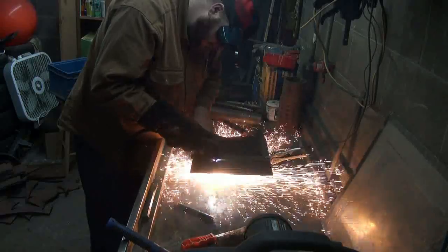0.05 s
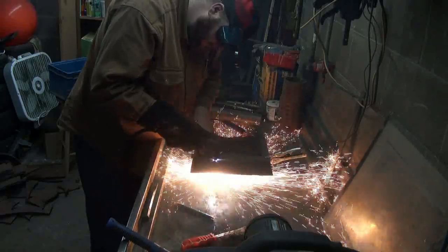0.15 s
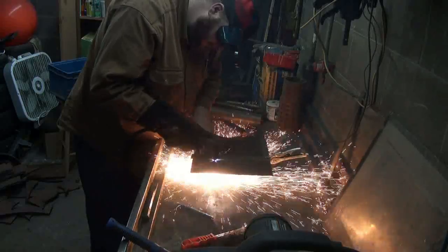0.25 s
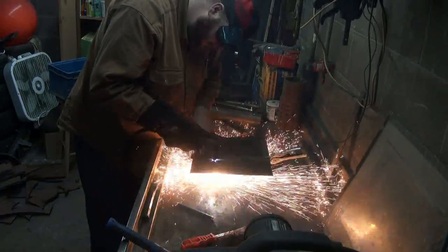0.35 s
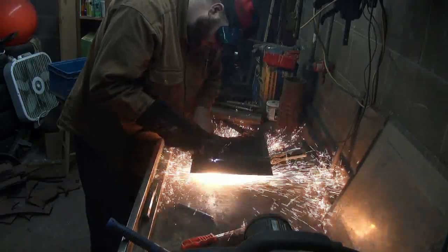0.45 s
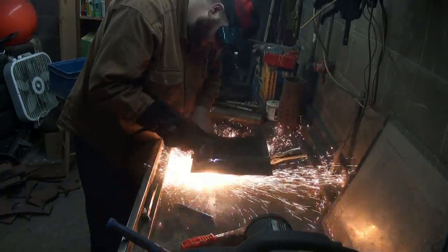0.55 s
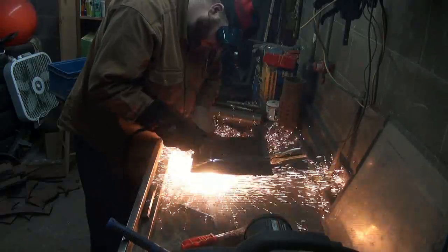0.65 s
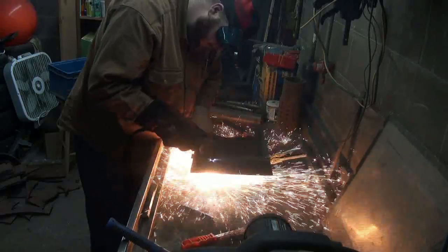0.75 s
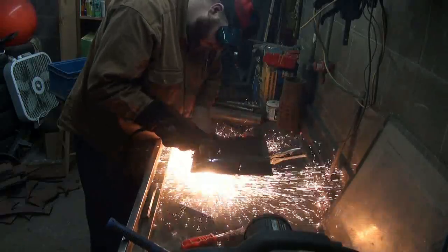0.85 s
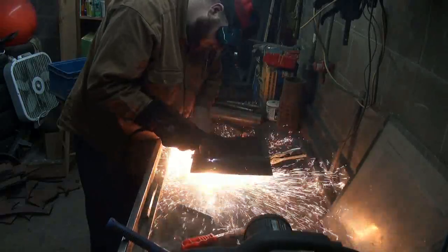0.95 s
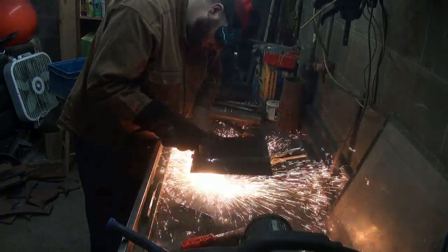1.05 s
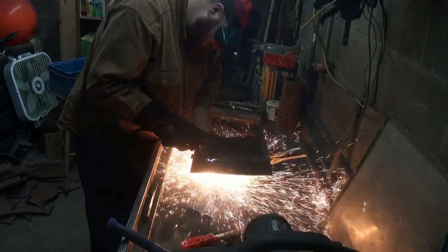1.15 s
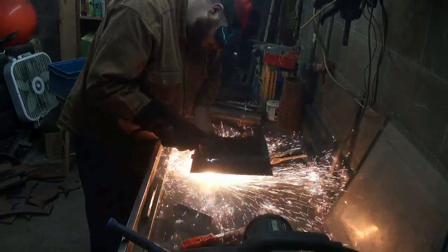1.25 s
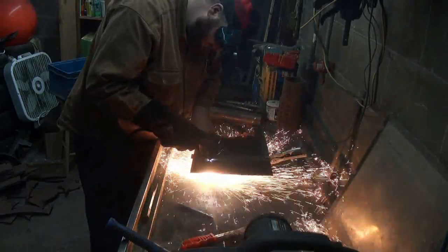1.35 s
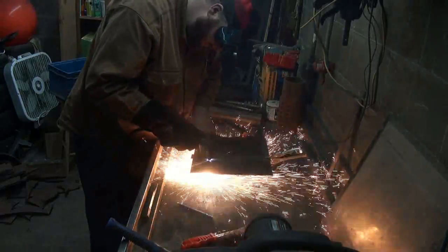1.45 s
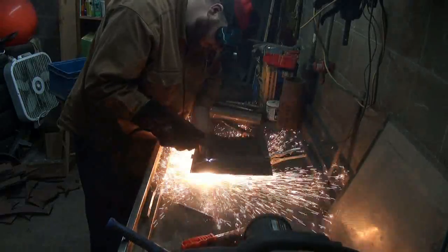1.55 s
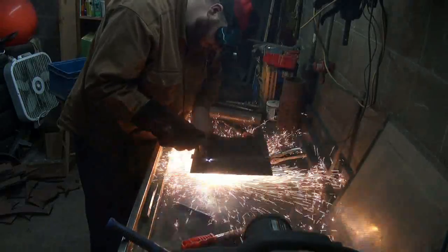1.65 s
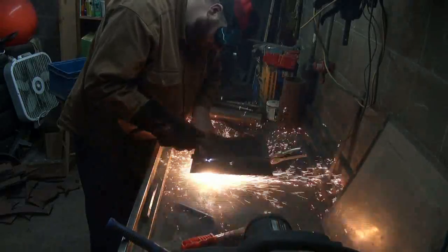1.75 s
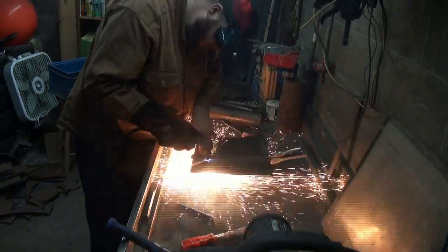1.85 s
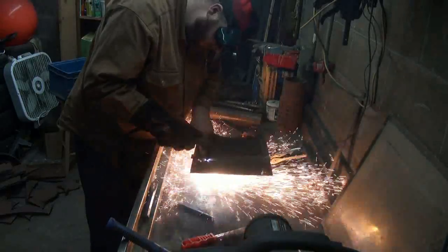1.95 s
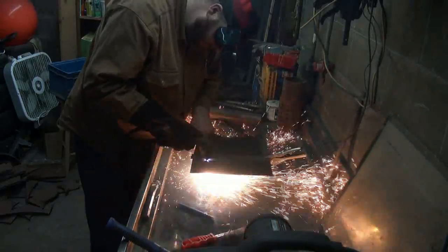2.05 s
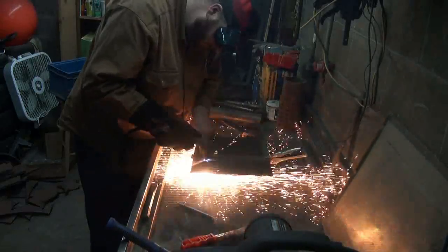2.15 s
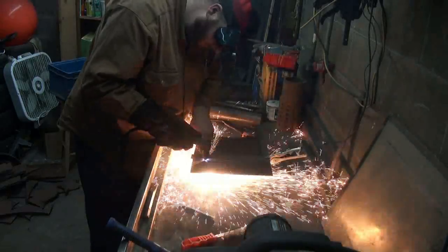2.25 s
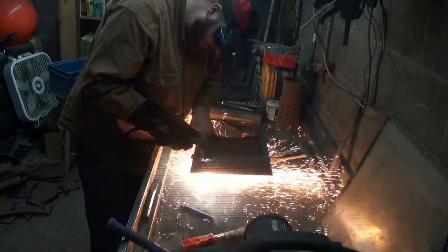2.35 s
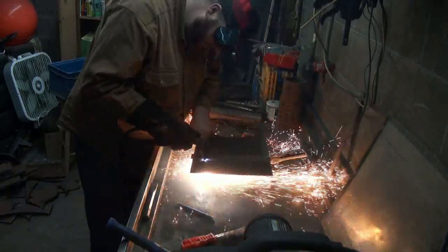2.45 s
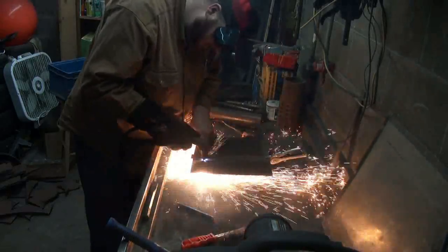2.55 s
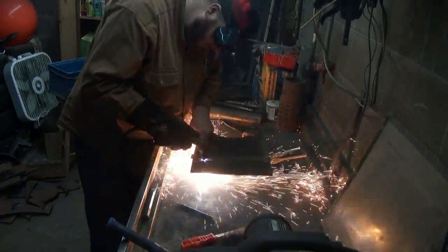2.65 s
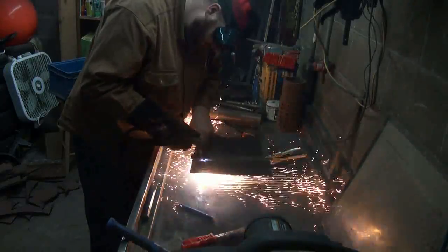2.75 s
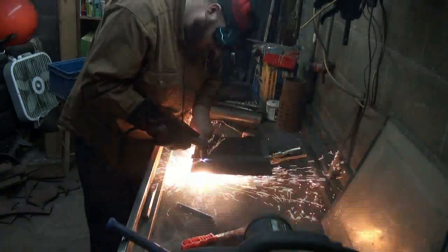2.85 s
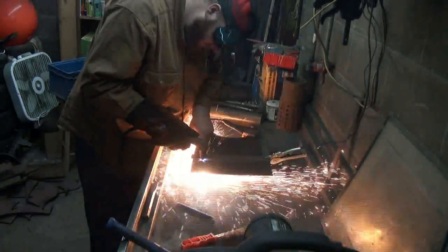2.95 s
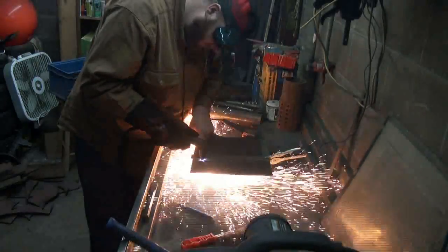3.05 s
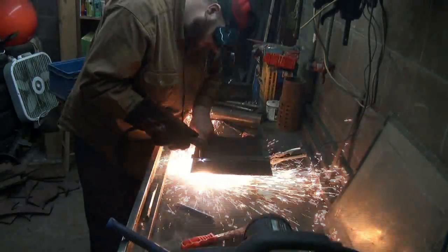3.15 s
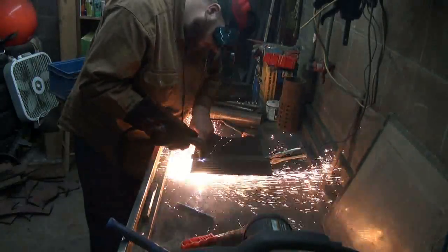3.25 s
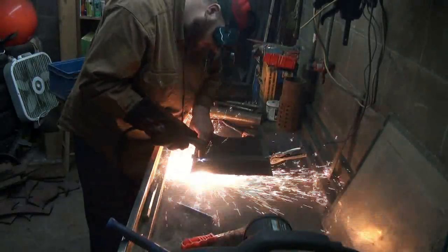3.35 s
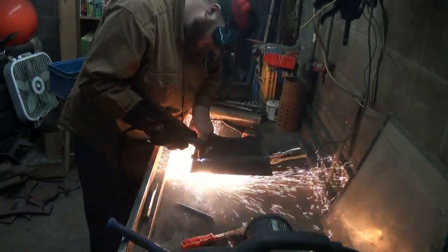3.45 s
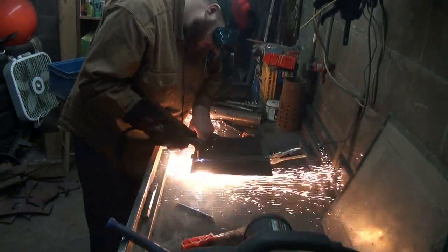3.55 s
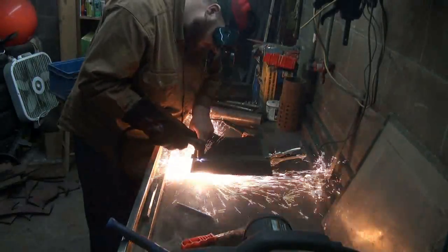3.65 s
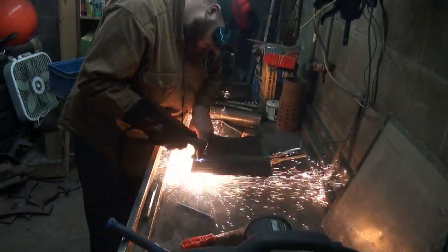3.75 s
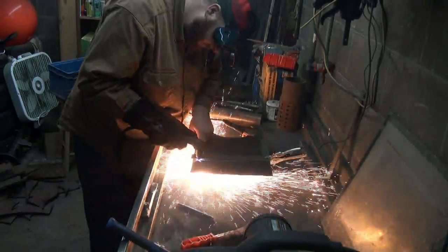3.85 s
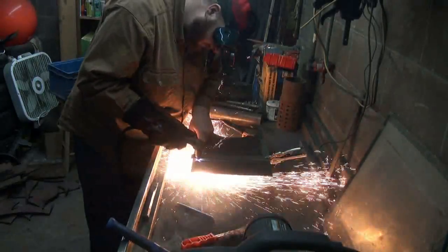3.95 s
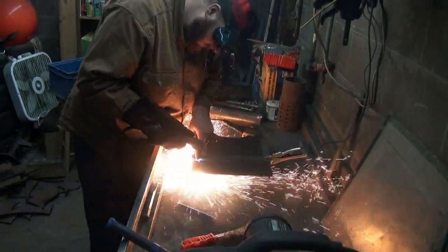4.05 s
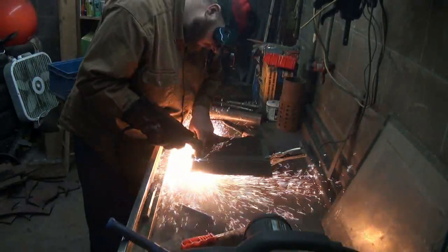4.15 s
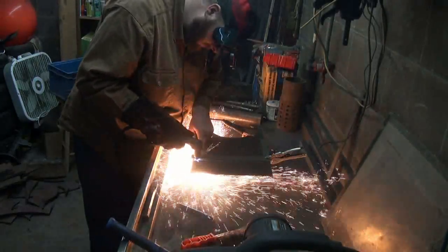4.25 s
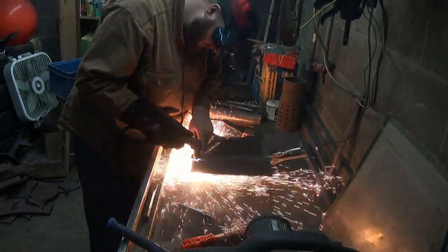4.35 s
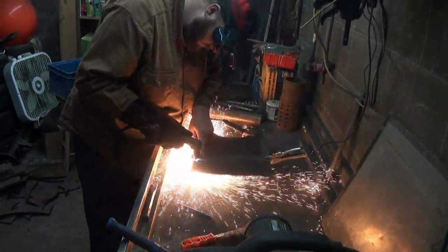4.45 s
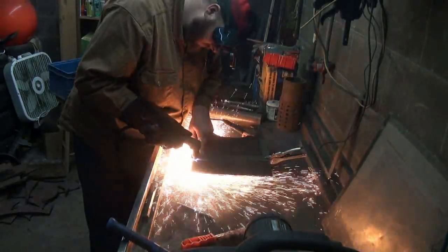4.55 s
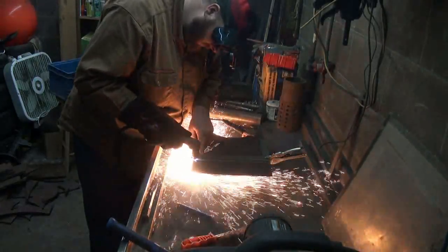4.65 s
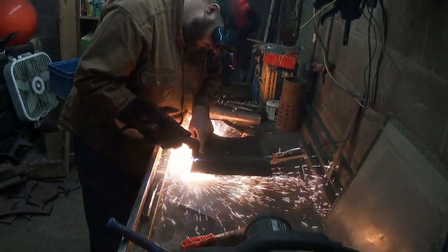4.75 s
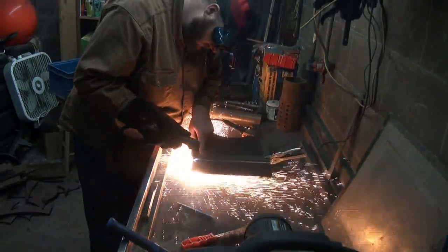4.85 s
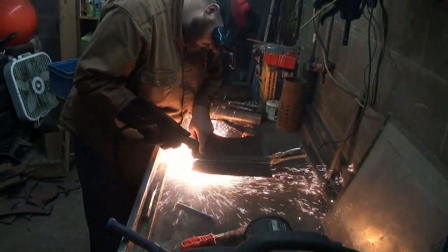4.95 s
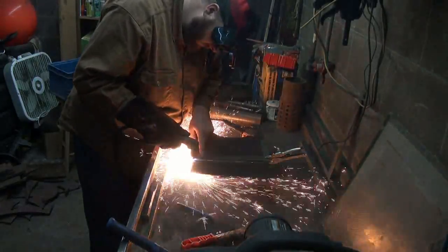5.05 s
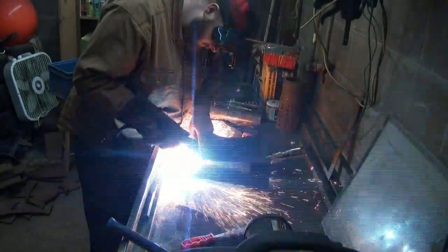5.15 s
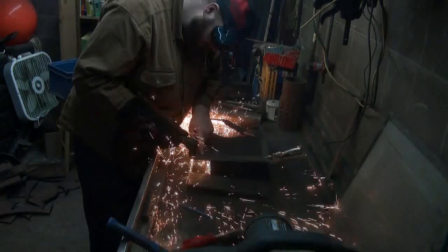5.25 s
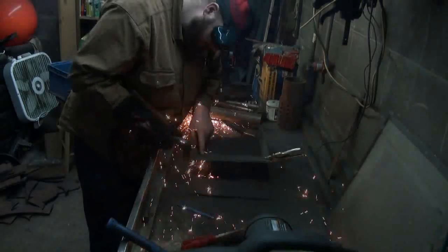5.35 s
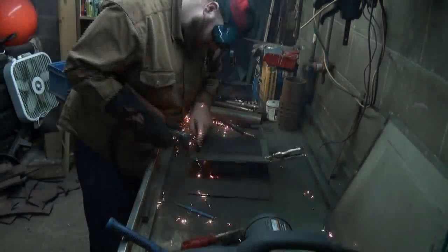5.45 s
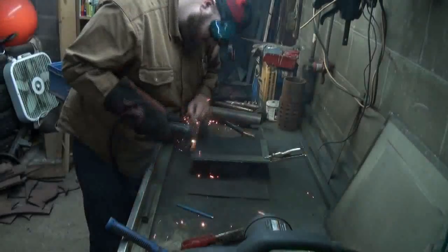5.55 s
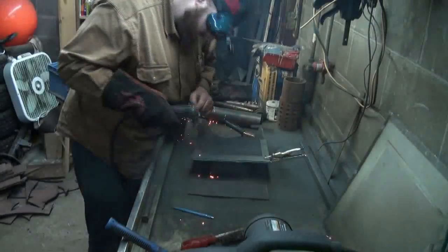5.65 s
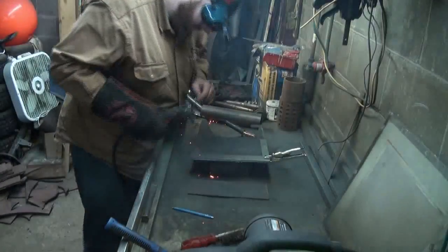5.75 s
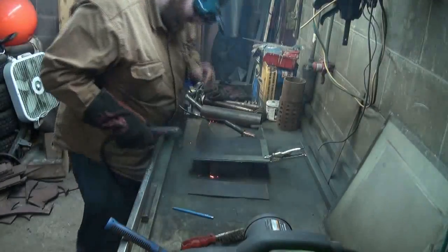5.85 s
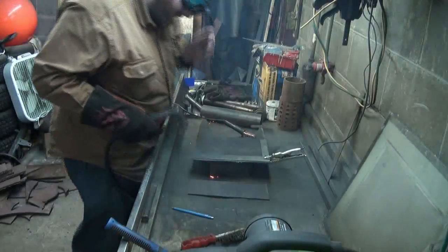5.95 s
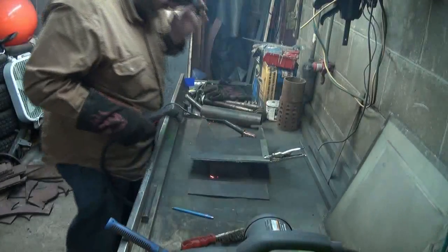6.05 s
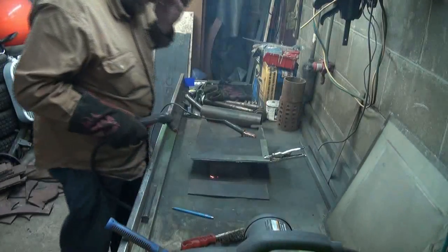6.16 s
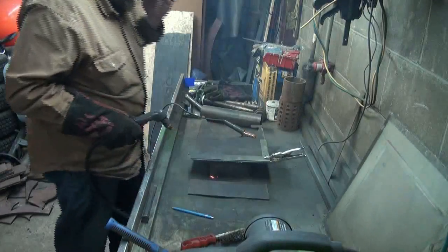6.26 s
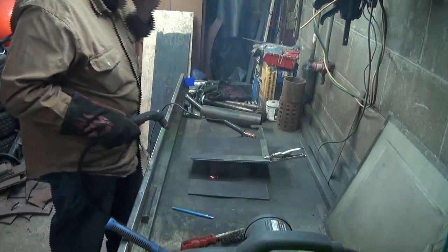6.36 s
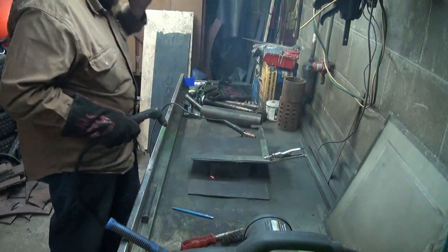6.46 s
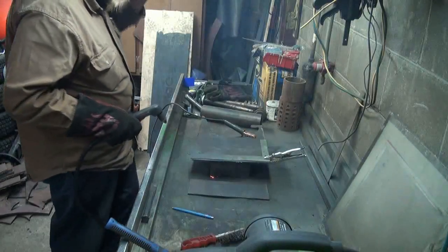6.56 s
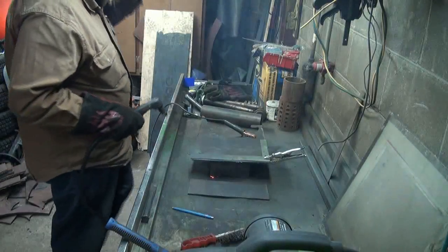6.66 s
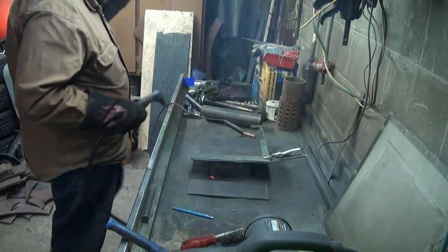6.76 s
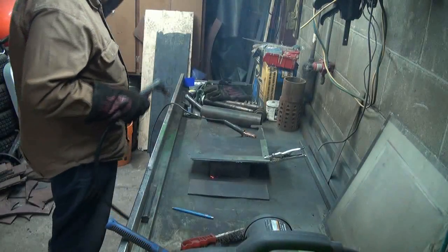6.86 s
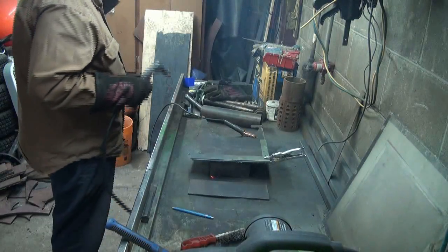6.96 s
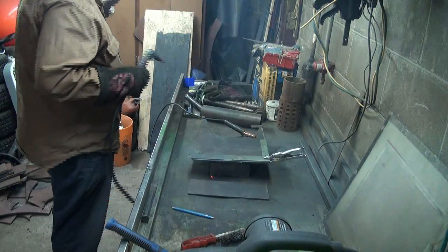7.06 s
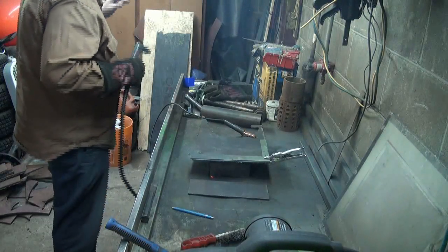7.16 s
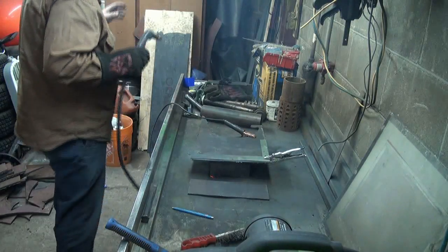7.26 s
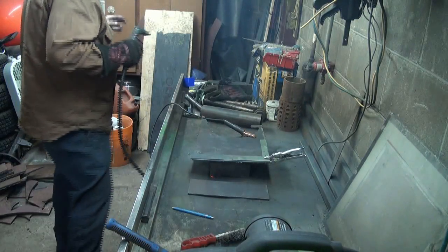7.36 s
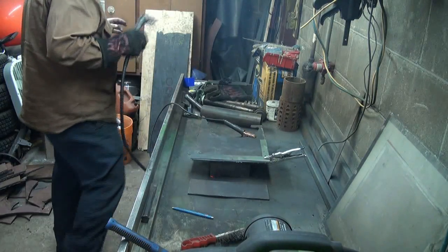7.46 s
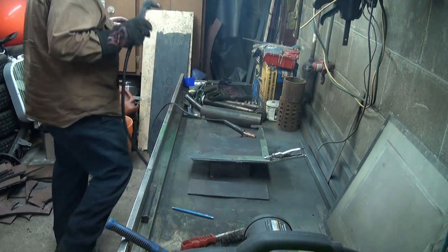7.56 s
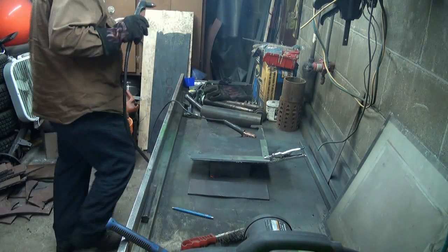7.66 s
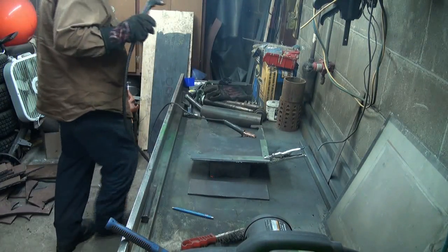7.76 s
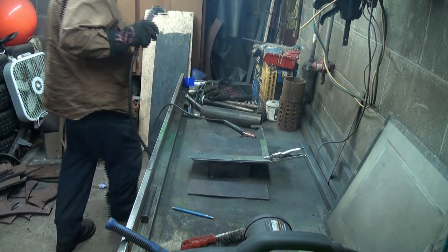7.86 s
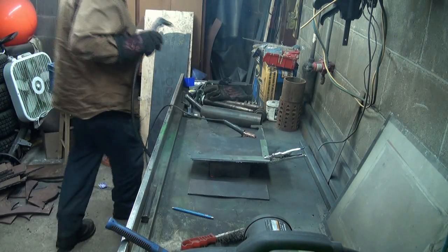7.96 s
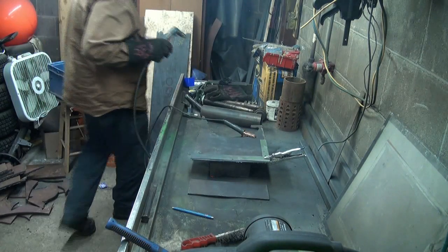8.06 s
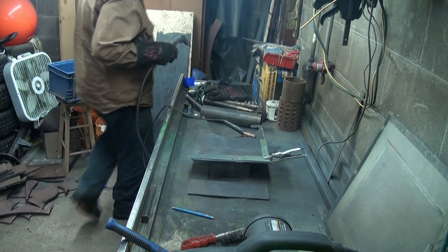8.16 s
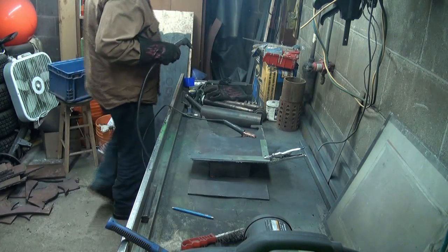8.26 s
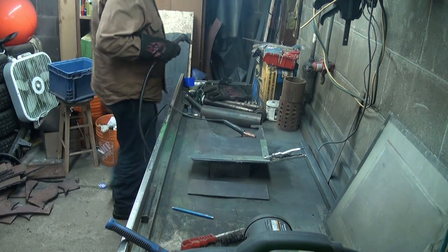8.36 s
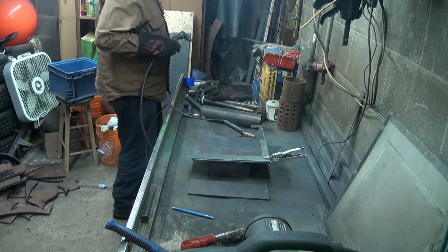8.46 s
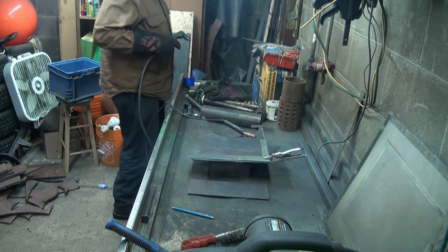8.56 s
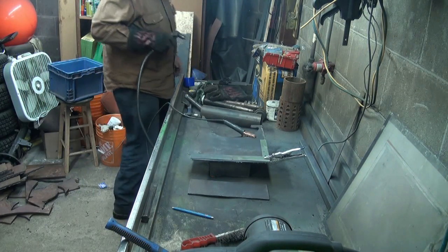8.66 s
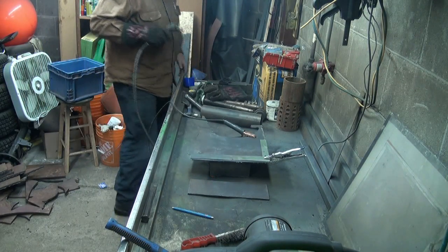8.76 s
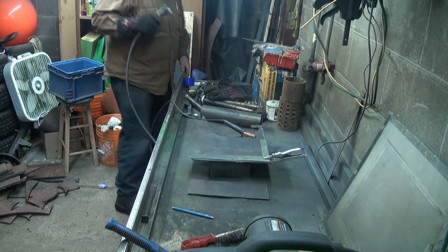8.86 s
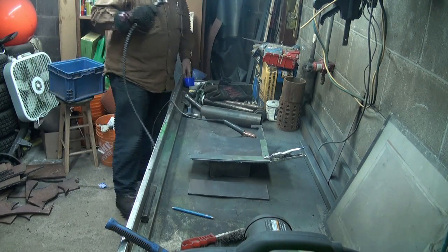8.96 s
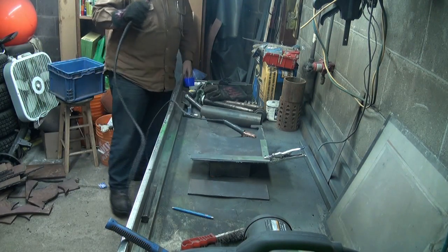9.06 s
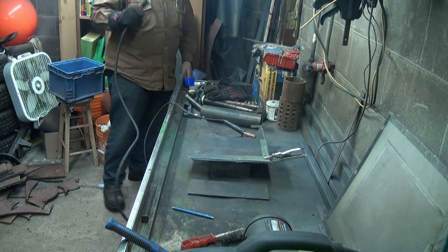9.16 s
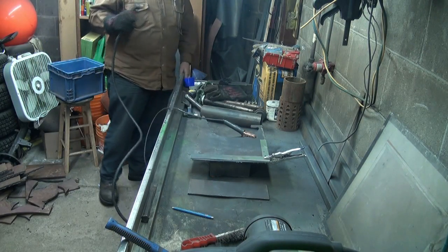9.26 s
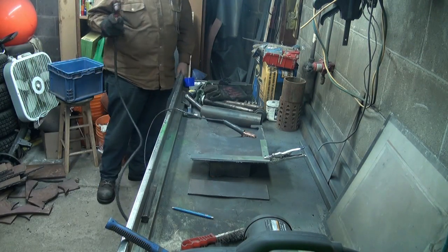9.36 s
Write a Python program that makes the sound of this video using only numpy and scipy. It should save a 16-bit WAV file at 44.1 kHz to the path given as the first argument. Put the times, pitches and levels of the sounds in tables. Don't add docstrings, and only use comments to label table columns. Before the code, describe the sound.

A plasma torch hisses and sputters loudly through steel plate, the offcut drops and clatters, then cooling air blows over a humming, ticking compressor.

```python
import sys
import numpy as np
from scipy import signal
from scipy.fft import rfft, irfft, next_fast_len
from scipy.io import wavfile
from scipy.ndimage import uniform_filter1d

SR = 44100
rng = np.random.default_rng(int(sys.argv[2]) if len(sys.argv) > 2 else 0)


def to_linear_factor(level_db):
    exponent = np.asarray(level_db, float) / 20
    return 10 ** exponent


def transcribe(signal):
    frames = np.atleast_2d(signal).T
    limited = np.clip(frames, -1, 1)
    pcm = np.round(limited * 32767).astype(np.int16)
    wavfile.write(sys.argv[1], SR, pcm)


N = 414540
TIME = np.arange(N) / SR
LEFT_RIGHT = np.array([[1], [-1]])
ARC_OUT_S, ARC_FADE_S = 5.372, 0.0075

# freq_hz, level_db (per Hz)
ARC_TONE = [(35, -46), (60, -29), (171, -19.5), (226, -26), (254, -16.5), (561, -19), (1010, -9),
            (1330, -10.5), (2870, -10.5), (11300, -0.5), (15700, -5.5)]
# freq_hz, side_minus_mid_db
ARC_SIDE = [(60, -12), (200, -6), (700, -4), (1700, -8), (3100, -7), (5500, -5.5), (8000, -4), (10300, -1),
            (11300, -5.5), (12200, -12), (15500, -8)]
# time_s, lift
LIFT = [(0, .6), (.45, 1), (.95, .55), (1.3, .95), (1.8, .85), (2, .3), (2.38, 0.15), (2.52, 0.55),
        (3.02, .2), (3.27, 0.64), (3.62, 0), (3.9, 0.2), (4.4, .2), (4.6, 0.4), (5.3, .5)]
# centre_s, level_over_roar_db, length_s
SPITS = [(0.233, 6, 0.3), (0.568, 3.5, .06), (.7, 2, .04), (0.853, 5.5, 0.045), (1.05, 3.5, 0.084),
         (1.433, 6.5, 0.14), (1.66, 4.5, 0.073), (1.735, 3, .04), (1.87, 3, .05), (1.986, 8.5, 0.11),
         (2.11, -5, .08), (2.224, 4.5, 0.043), (2.407, 7.5, 0.22), (2.61, 7.5, 0.025), (2.73, 6, 0.056),
         (2.817, -8, .08), (3.02, 3, 0.098), (3.3, 7.5, .06), (3.48, 1, .1), (3.693, 7.5, 0.074),
         (3.962, 3, 0.26), (4.212, 4, 0.17), (4.499, -1.5, .15), (4.65, 4, 0.082), (4.734, 2, .05),
         (5.083, 6, 0.055), (5.17, 1.5, .05)]


def arc():
    lift = curves(LIFT)[0]
    spit = sum(db * np.exp(-(2 * (TIME - s) / length) ** 2) for s, db, length in SPITS)
    flare = 3 * np.clip((TIME - 5.33) / 0.033 + 1, 0, 1)
    top = -18.5 - 0.16 * spit
    hiss = top + 3 * lift
    body = -19.5 - 3.5 * lift + 0.16 * spit + flare
    roar = -34 - 4 * lift + spit + 1.07 * walk(29.95)
    levels_db = (roar, body, hiss - 6.5, hiss - 3.8, top - 3.5)
    dry = jet(ARC_TONE, (2480, 7520, 9600, 12200), levels_db, (.1, .4, .8), (14, 40, 150))
    dry += nozzle(550, lift) * to_linear_factor(hiss)
    alive = np.exp(-np.clip(TIME - ARC_OUT_S, 0, 1) / ARC_FADE_S)
    pan_db = -3 - 1.5 * lift
    heard = shop(dry * alive, ARC_SIDE, echo=1.0, tail_db=-6.5, t60_s=0.21, hold_s=.26)
    return to_linear_factor(0.53 + pan_db * LEFT_RIGHT / 2) * heard


def jet(tone, edges_hz, levels_db, flutter_db, rates):
    together = sum(db * walk(rate) for db, rate in zip(flutter_db, rates))
    bounds = [0, *edges_hz, np.inf]
    out = 0
    for low_hz, high_hz, db in zip(bounds, bounds[1:], levels_db):
        def band_gain(hz):
            share = np.abs(above(hz, low_hz) - above(hz, high_hz))
            return shape(tone, hz) * np.sqrt(share)
        band = unit(colour(rng.standard_normal(N), band_gain))
        own = 0.32 * walk(22.05) + 0.68 * walk(4.05)
        out = out + band * to_linear_factor(db + together + own)
    return out


def nozzle(width_hz, lift):
    centre_hz = 11500 - 700 * lift + 249.8 * walk(4)
    a, b = colour(rng.standard_normal((2, N)), lambda hz: np.exp(-(hz / width_hz) ** 2))
    phase = 2 * np.pi * np.cumsum(centre_hz) / SR
    return unit(a * np.cos(phase) + b * np.sin(phase)) * to_linear_factor(-11 + 3 * lift + 1.1 * walk(8))


# start_s, level_db, contact_s, ring_t60_s, brightness_db (above 4.3 kHz)
DROP = [
    (5.318, -21.5, 0.021, 0.41, -5),
    (5.342, -17, 0.021, 0.21, 1),
    (5.37, -23, 0.015, 0.23, -4),
    (5.391, -22, 0.0078, 0.59, 3),
    (5.481, -21.5, 0.0064, 0.062, 6),
    (5.484, -17, 0.039, 0.29, -1),
    (5.548, -23.5, .006, 0.41, -6),
    (5.608, -35, .02, 0.24, -10),
]
# freq_hz, level_db (per Hz)
DROP_TONE = [(41, -54), (70, -22), (265, -4.5), (820, -4), (896, -4.5), (1220, -2), (2480, -9), (4620, -9),
             (6030, -15), (6440, -9.5), (14000, -29)]
# freq_hz, width_hz, level_db
PLATE = [(103, 16, 10), (172, 15, -4), (270, 14, -2), (378, 15, -3), (467, 29, -5.5), (720, 35, -7),
         (847, 25, -8), (1040, 33, -19), (1720, 31, -22), (2410, 40, -17), (5160, 90, -12), (6360, 80, -15)]
# start_s, pitch_hz, level_db, t60_s
RINGS = [
    (5.4835, 8400, -29, .12),
    (5.4835, 6450, -22.5, 0.11),
    (5.4835, 5100, -30, .06),
    (5.425, 2420, -31, 0.6),
]


def offcut():
    def rattle_gain(hz):
        modes = sum(1.34 * to_linear_factor(db) / (1 + ((hz - centre) / width) ** 2) for centre, width, db in PLATE)
        return shape(DROP_TONE, hz) * (0.66 + modes)

    rattle = colour(rng.standard_normal(N), rattle_gain)
    top = colour(rattle, lambda hz: above(hz, 4300))
    low = rattle - top
    scale = np.std(rattle)
    dry = 0
    for s, db, contact, t60, bright_db in DROP:
        since = TIME - s
        rise = np.clip(since / 0.001, 0, 1)
        after = np.clip(since - contact, 0, 9)
        bounce = low * to_linear_factor(-60 * after / t60) + top * to_linear_factor(bright_db - 90 * after / t60)
        dry = dry + rise * to_linear_factor(db) * bounce
    for s, hz, db, t60 in RINGS:
        since = np.clip(TIME - s, 0, 9)
        ring = np.sin(2 * np.pi * hz * since + .5 * walk(200)) * (since > 0)
        dry = dry + scale * to_linear_factor(db + 4.5 - 60 * since / t60) * ring
    dry = dry / scale * to_linear_factor(0.48 * walk(120))
    heard = shop(dry, ARC_SIDE, echo=0, tail_db=-10, t60_s=0.16, hold_s=0.597)
    return to_linear_factor(-1.04 - 1.3 * LEFT_RIGHT) * heard


# freq_hz, level_db (per Hz)
AIR_TONE = [(1200, -22.5), (2200, -20.5), (4000, -13.5), (6500, -7), (9500, -6), (11000, -3), (12000, -1),
            (13200, -1), (14200, -7), (15700, -3)]
# freq_hz, side_minus_mid_db
AIR_SIDE = [(1500, -1.5), (4500, -5.5), (7500, -5.5), (10500, -1.5), (11300, -6), (12100, -11),
            (15500, -13)]
# time_s, level_db
AIM = [
    (5.7, 3),
    (6.6, 0.5),
    (7.5, -0.5),
    (7.8, 1.5),
    (8.2, -1.5),
    (8.85, -2),
    (8.96, 2),
    (9.2, 3.5),
    (9.4, 2),
]


def air():
    aim = curves(AIM)[0]
    hiss = -23.5 + aim + gain_control()
    turned = np.clip((TIME - 6.23) / 1.27, 0, 1)
    body_db = -1 - 4.5 * turned
    pan_db = -4 + 2.6 * turned
    body = hiss + body_db
    levels_db = (body - 6 - 0.44 * aim, body - 1.2, hiss - 3.5, hiss - 2.6)
    dry = jet(AIR_TONE, (4400, 8000, 11000), levels_db, (.1, .4, .6), (12, 40, 150))
    dry += nozzle(600, 0) * to_linear_factor(hiss - 4.0)
    on = np.clip((TIME - 5.33) / 0.058, 0, 1)
    heard = shop(dry * on, AIR_SIDE, echo=0, tail_db=-8, t60_s=0.18, hold_s=.12)
    return to_linear_factor(1.33 + pan_db * LEFT_RIGHT / 2) * heard


SHAFT_HZ = 28.45
# multiple_of_shaft_turn, level_db
ORDERS_DB = [(3, -41.5), (6, -42.5), (9, -38), (12, -43.5), (15, -50), (18, -46), (21, -45), (24, -47),
             (30, -49)]
# pitch_hz, level_db
MAINS = [(118.8, -47), (205, -49), (293, -48.5), (266.3, -43), (468, -47), (445, -48), (419, -49),
         (622, -52)]
# freq_hz, level_db (per Hz)
PUMP_TONE = [(15, -50), (28, -26), (43, -22), (62, -30), (95, -2), (145, -15.5), (230, -7.5), (310, -5),
             (370, -8), (440, -4), (520, -1), (570, -6.5), (700, -7), (1000, -14.5)]
# freq_hz, level_db (per Hz)
FAN_TONE = [(700, -9), (1100, 2.5), (2200, -4), (5000, -3), (7500, -7), (12000, -40)]
# freq_hz, side_db
PUMP_SIDE = [(60, -14), (110, -6), (200, -2), (380, -1.5), (700, 3), (1290, 7.5), (2380, -1), (4400, 0),
             (8120, 0), (15000, -2.5)]
# freq_hz, pan_db
PUMP_PAN = [(60, -7.5), (110, -2.5), (200, -7.5), (380, -7), (700, -11), (1290, -8.5), (2380, -12.5),
            (4400, -7), (8120, 0), (15000, -1.0)]


def compressor():
    turn = 2 * np.pi * SHAFT_HZ * TIME + 0.077 * walk(3)
    tones = 0
    for k, db in ORDERS_DB:
        tones = tones + to_linear_factor(db + 1.5 + (0.6 + 0.089 * k) * walk(6)) * np.sin(k * turn + k * k)
    for hz, db in MAINS:
        hum = np.sin(2 * np.pi * hz * TIME + 0.63 * walk(5))
        tones = tones + to_linear_factor(db + 3.0 + 3.1 * walk(8)) * hum
    noise = rng.standard_normal((6, N))
    pulse = to_linear_factor(-29.5 + 0.81 * walk(9)) * (1 + 0.1 * np.sin(3 * turn))
    rumble = unit(colour(noise[:2], lambda hz: shape(PUMP_TONE, hz))) * pulse
    fan = unit(colour(noise[4:], lambda hz: shape(FAN_TONE, hz))) * to_linear_factor(-37 + .5 * walk(11))
    click = unit(colour(noise[2:4], lambda hz: above(hz, 570) * (1 - above(hz, 5100)))) * valve()
    mid, other = rumble + fan + click + tones * np.array([[1], [.6]])
    both = mid + LEFT_RIGHT * colour(other, lambda hz: shape(PUMP_SIDE, hz)) * 0.6
    return colour(both, lambda hz: shape(PUMP_PAN, hz) ** (LEFT_RIGHT / 2)) * to_linear_factor(gain_control())


def valve():
    turns_per_belt, belt_phase = 4.62, -.15
    turns = np.floor(np.arange(-4, 19) * turns_per_belt + belt_phase)
    times = 6.556 + turns / SHAFT_HZ
    levels_db = -28 + rng.standard_normal(len(times))
    out = 0
    for s, db in zip(times, levels_db):
        rise = np.clip((TIME - s + 0.0093) / 0.002, 0, 1)
        out = out + to_linear_factor(db) * rise * np.exp(-np.clip(TIME - s + 0.0094, 0, 1) / 0.015)
    return out


def gain_control():
    held = -14.5 + 0.52 * TIME
    recovery = 3.5 * np.clip(TIME - 5.19, 0, 9)
    return np.minimum(held + recovery, 3)


# start_hz, end_hz, width_hz, start_db, end_db
ECHOES = [(685, 630, 89, 6.5, 3.5), (1000, 930, 100, 2, -3.5), (1325, 1200, 170, -6, -4.5),
          (1730, 1820, 330, 0, 5.5), (2170, 1960, 140, 4.5, -3), (2260, 2460, 210, -1, -4),
          (2570, 2580, 110, 4, 4.5), (2890, 2810, 185, 4, 7), (3340, 3140, 160, 5, 4),
          (3930, 3530, 170, -3, 5), (4040, 3800, 240, 0, 0), (4040, 3900, 220, 0.5, 3.5),
          (4630, 5400, 500, -2, -1), (5870, 5500, 340, 2, 3.5), (6220, 5900, 170, 5.5, -4.5),
          (7000, 6370, 360, 0.5, 3), (8000, 8850, 1180, -1.5, -4), (9020, 8250, 170, 4.5, -3.5),
          (10300, 11600, 320, 2.5, -3.5), (11600, 12500, 320, 1.5, 3), (12300, 13100, 650, 0.5, 3)]


def shop(x, side, echo, tail_db, t60_s, hold_s, size=8192):
    hop = int(hold_s * SR)
    lead = 300
    out = np.zeros((2, N + 200000))
    hz = np.fft.rfftfreq(size, 1 / SR)
    fade = np.sin(np.pi * np.arange(2 * hop) / (2 * hop))
    padded = np.pad(x, (hop, 2 * hop))
    for start in range(0, N + hop, hop):
        moved = min(start / SR / ARC_OUT_S, 1)
        sway = rng.standard_normal((len(ECHOES), 2))
        near_db = 0
        for (a, b, width, g, h), (u, v) in zip(ECHOES, sway):
            level_db = g + moved * (h - g) + 1.32 * u
            offset = (hz - a - moved * (b - a)) / width - 0.22 * v
            near_db = near_db + level_db * np.exp(-2 * offset ** 2)
        tail = diffuse((2, size), t60_s)
        clutter = to_linear_factor(-8) * diffuse(size, .025)
        mid = 1 + to_linear_factor(tail_db) * tail[0] + clutter * above(hz, 2400)
        mid /= np.sqrt(uniform_filter1d(np.abs(mid) ** 2, size=110))
        both = (mid + LEFT_RIGHT * tail[1] * shape(side, hz)) * to_linear_factor(echo * near_db)
        response = np.roll(irfft(both, size), lead, axis=1)
        piece = padded[None, start:start + 2 * hop] * fade ** 2
        heard = signal.fftconvolve(piece, response, axes=1)
        out[:, start:start + heard.shape[1]] += heard
    return out[:, hop + lead:hop + lead + N]


def diffuse(dims, t60_s):
    tail = rng.standard_normal(dims) * to_linear_factor(-60 * np.arange(np.atleast_1d(dims)[-1]) / SR / t60_s)
    return rfft(tail / np.sqrt(np.sum(tail ** 2, axis=-1, keepdims=True)))


def unit(x):
    return x / np.sqrt(np.mean(x ** 2))


def curves(table):
    s, *columns = np.transpose(table)
    return [np.interp(TIME, s, c) for c in columns]


def shape(points, hz):
    f, db = np.transpose(points)
    return to_linear_factor(np.interp(np.log(hz + 1), np.log(f + 1), db))


def colour(x, gain):
    n = next_fast_len(N)
    return irfft(rfft(x, n) * gain(np.fft.rfftfreq(n, 1 / SR)), n)[..., :N]


def walk(rate):
    k = int(SR / rate)
    steps = np.repeat(rng.standard_normal(N // k + 1), k)
    return unit(uniform_filter1d(uniform_filter1d(steps, k), k)[:N])


def above(hz, edge_hz):
    return 1 / (1 + (edge_hz / (hz + 1)) ** 6)


def scene():
    return arc() + offcut() + air() + compressor()


def roll_off(x):
    return signal.sosfilt(signal.butter(12, 16920, fs=SR, output="sos"), x)


def record(dry):
    rounded = np.tanh(0.83 * dry) / 0.79
    mix = colour(rounded, lambda hz: hz < 15730)
    return roll_off(mix)


dry = scene()
out = record(dry)
transcribe(out)
```